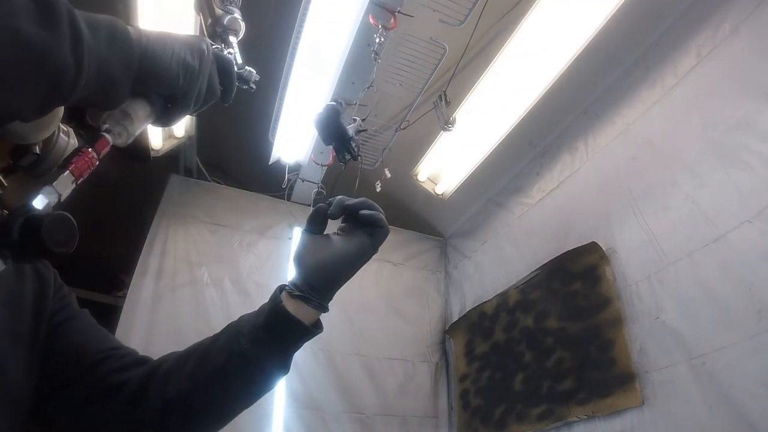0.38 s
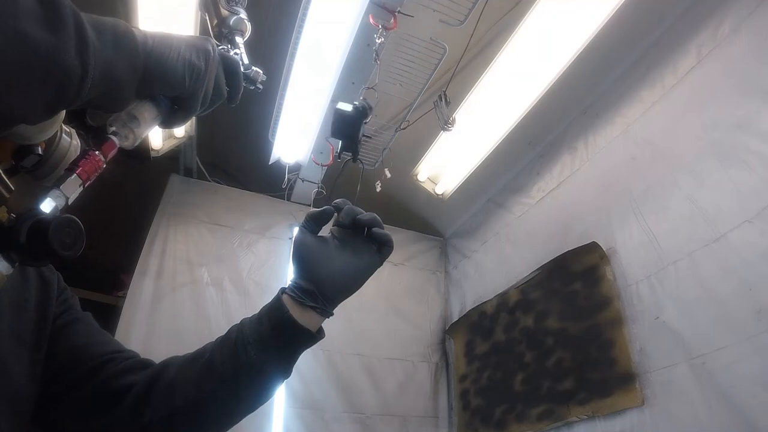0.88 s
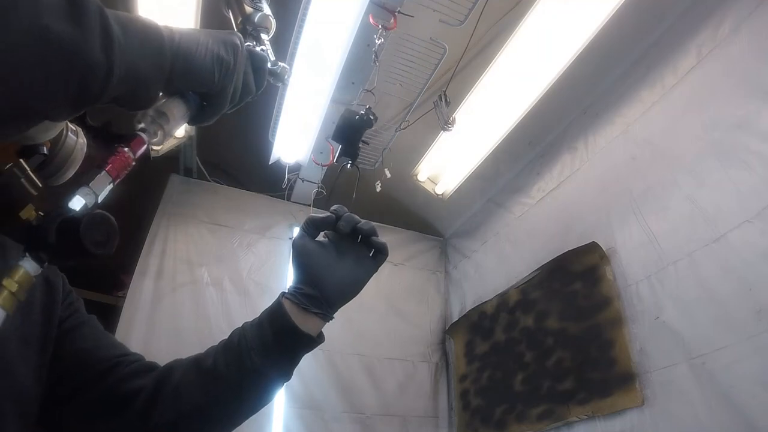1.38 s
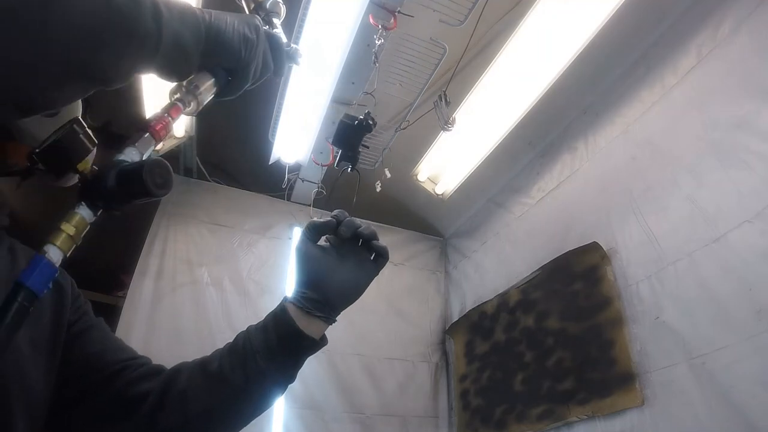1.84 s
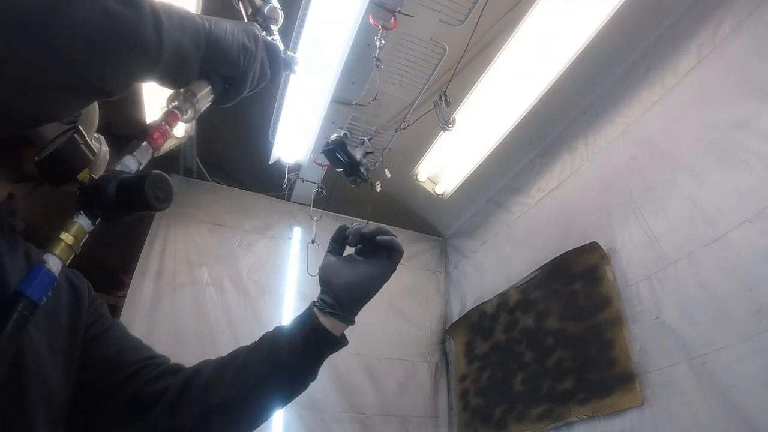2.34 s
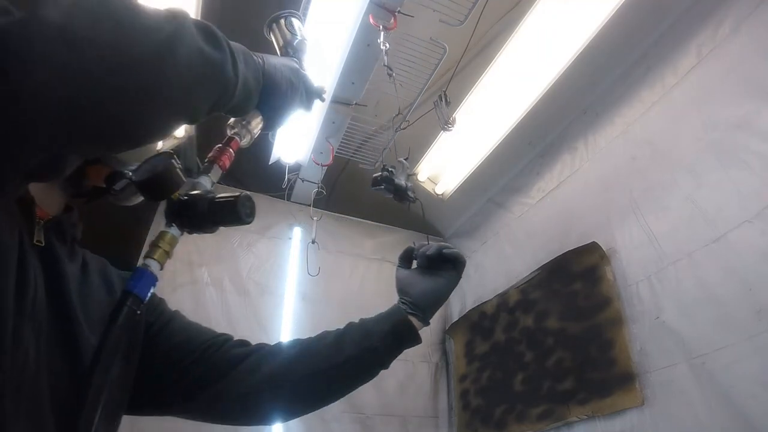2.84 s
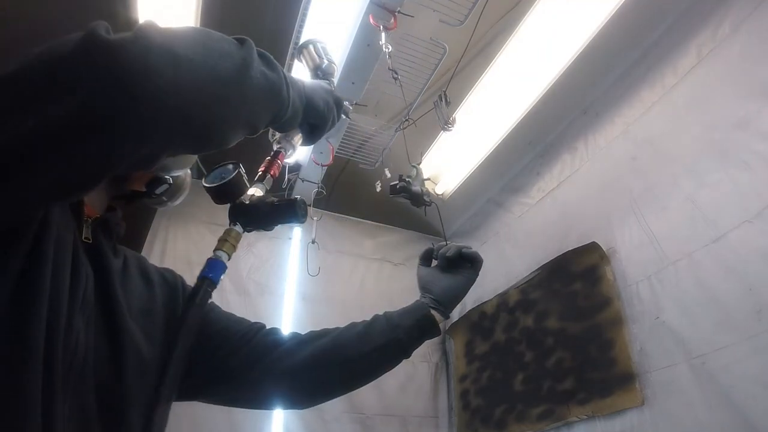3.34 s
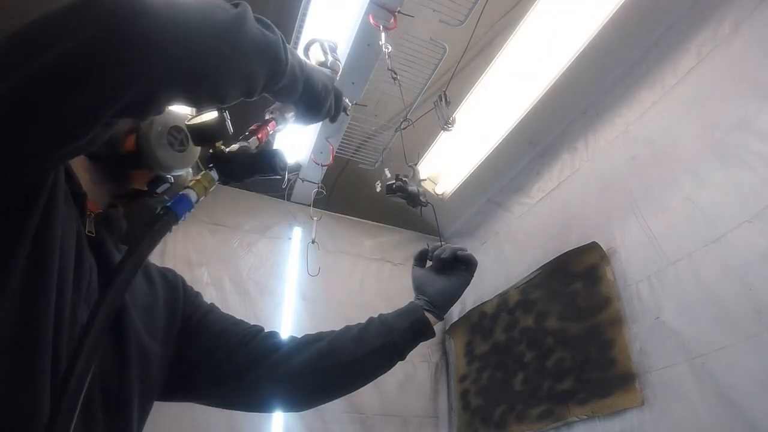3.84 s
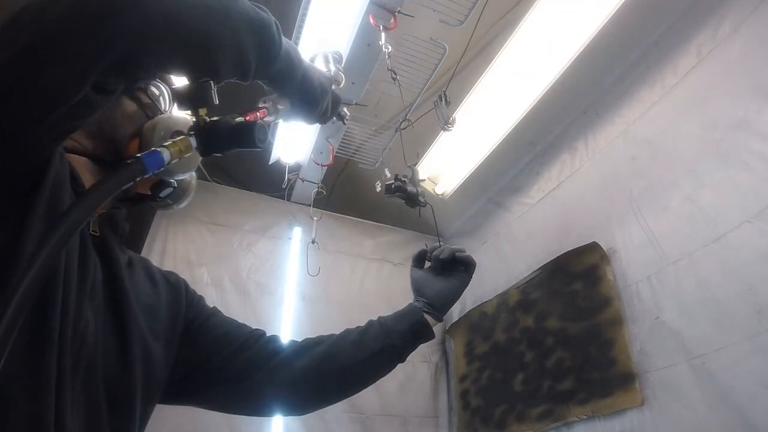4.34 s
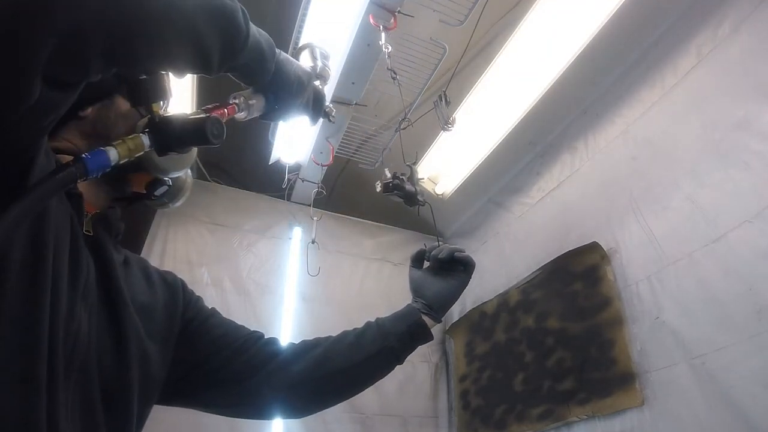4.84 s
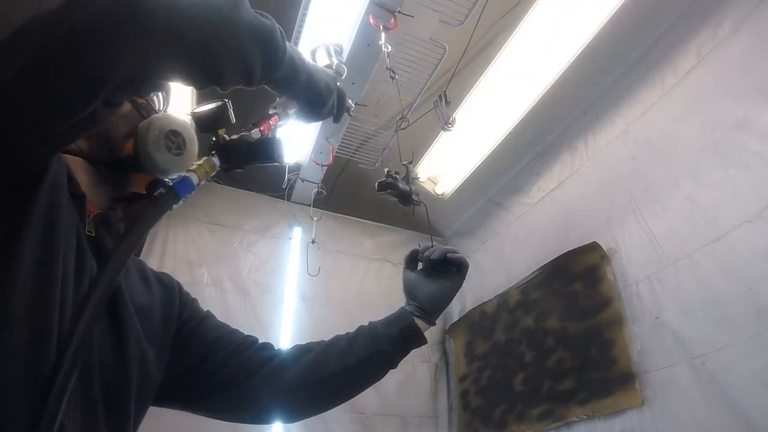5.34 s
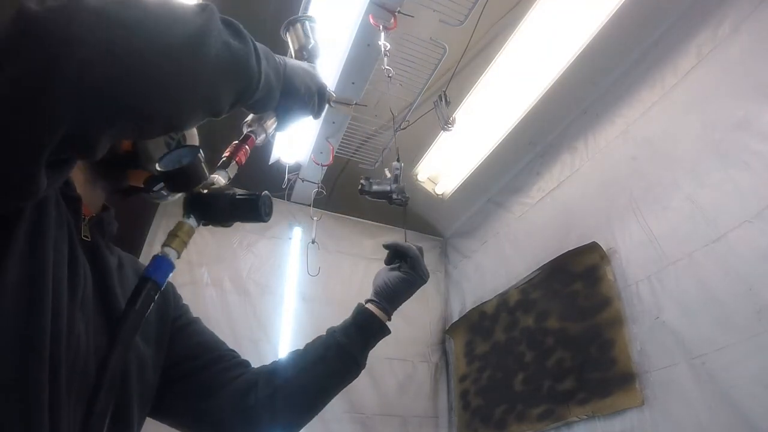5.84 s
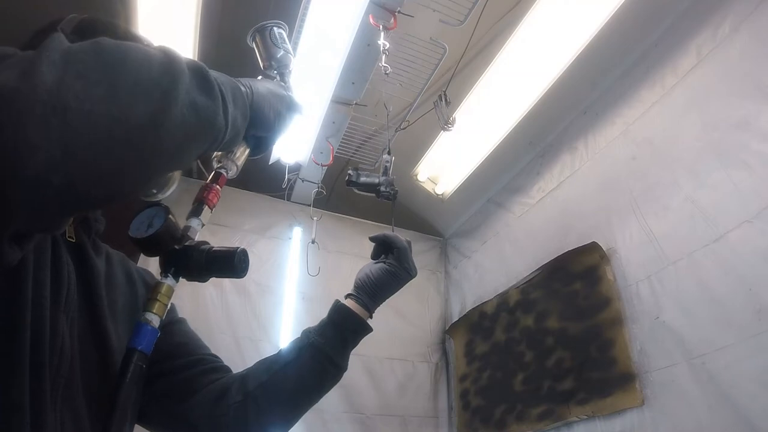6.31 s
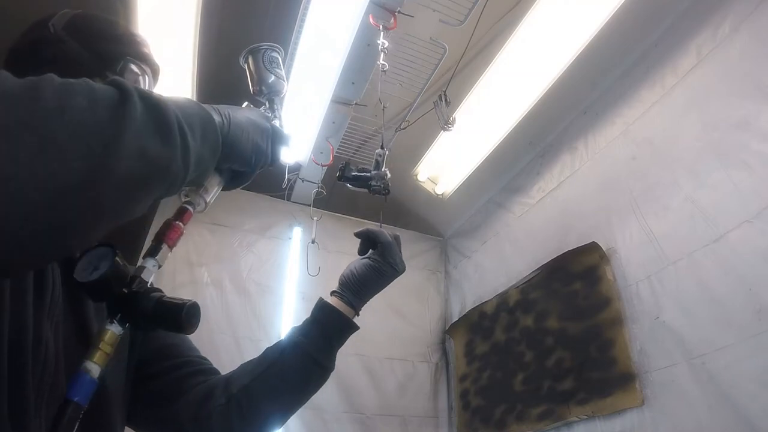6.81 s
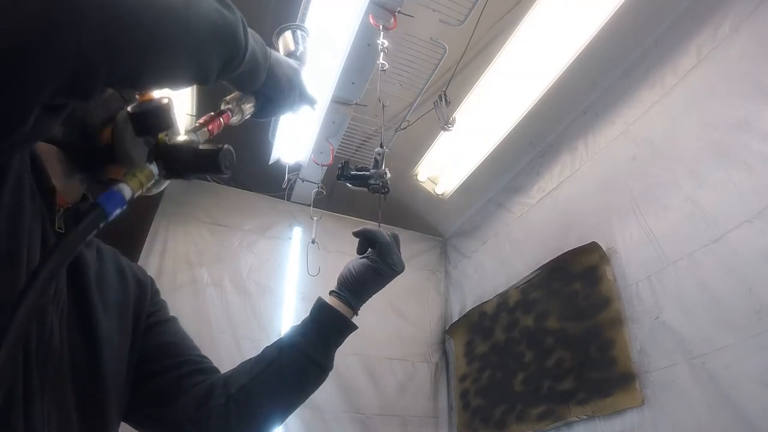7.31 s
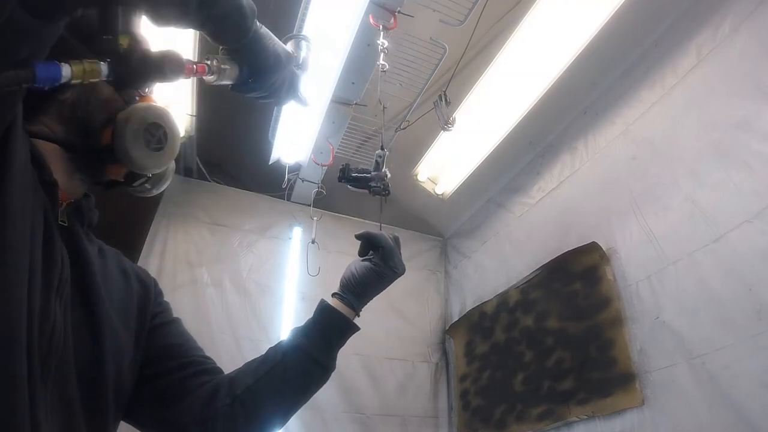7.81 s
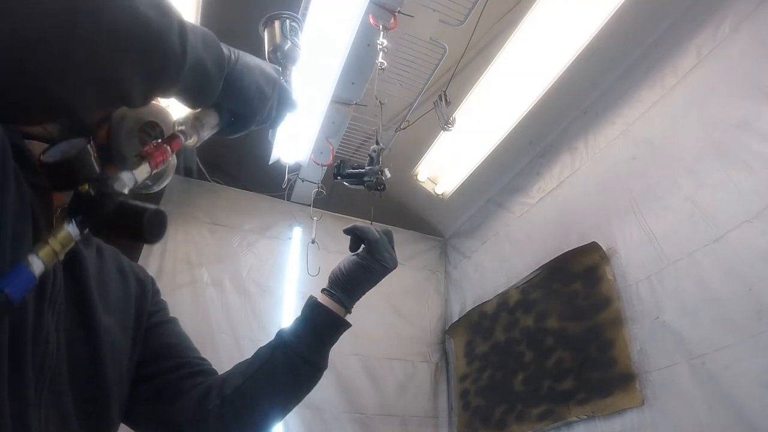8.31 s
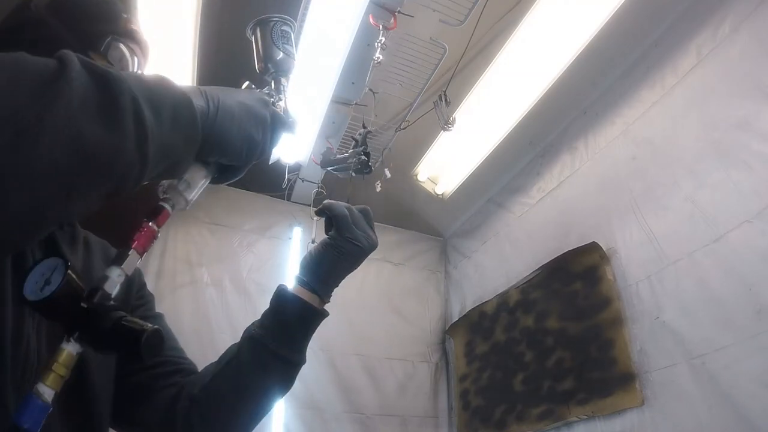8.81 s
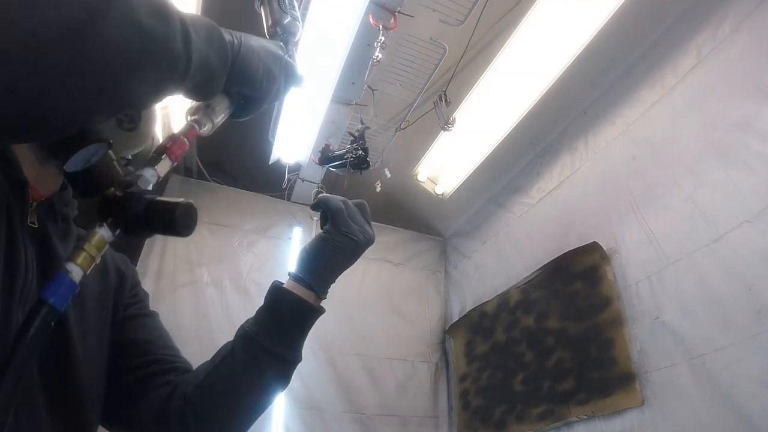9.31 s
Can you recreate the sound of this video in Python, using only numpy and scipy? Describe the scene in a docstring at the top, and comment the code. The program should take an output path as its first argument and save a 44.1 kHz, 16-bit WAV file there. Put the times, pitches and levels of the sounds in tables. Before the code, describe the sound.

A spray gun fires eight short bursts of airy hiss, fuller at first, later brighter, over a fan's rush; a hanging part knocks once.

```python
"""Spray gun in a booth

A compressed-air spray gun is fired in short trigger pulls inside a spray booth, close to the microphone.
The jet is shaped noise that hisses, duller or brighter as the gun turns; sparse echoes ring after each pull.
The booth's fan drones behind it: a steady rush of noise with faint sine tones from the blades.
Once the hanging part gives a knock and rattles: a burst of dying sine tones and noise."""
import sys
import numpy as np
from scipy import signal
from scipy.io import wavfile
from scipy.ndimage import uniform_filter1d

SR = 44100
rng = np.random.default_rng(int(sys.argv[2]) if len(sys.argv) > 2 else 0)


def master(y):
    """Save y as 16-bit WAV."""
    cut = np.clip(np.atleast_2d(y).T, -1, 1)
    pcm = np.round(cut * 32767)  # scale
    wavfile.write(sys.argv[1], SR, pcm.astype(np.int16))


def amplitude_ratio(level_db):
    """Convert a level in decibels to the matching linear amplitude (field) ratio."""
    exponent = np.asarray(level_db, float) / 20
    return 10 ** exponent


N = 426447  # length of the sound (samples)
LEAD = SR // 4  # samples played before time zero, so that an earlier pull rings on


def evened(x):
    """Scales a sound to an rms level of 1."""
    return x / np.sqrt(np.mean(x ** 2) + 1e-20)


def read(points, hz):
    """Reads a table of (pitch, value) between its points, along log frequency."""
    f, value = np.transpose(points)
    return np.interp(np.log(hz + 1), np.log(f + 1), value)


def noise(length, size, colour_db, patchy_db, flicker_db):
    """Noise from random short-time spectra under colour_db(Hz, s), with drifting patches and a shared flicker."""
    hop = size // 4
    frames = length // hop + 5
    hz = np.fft.rfftfreq(size, 1 / SR)
    t = np.arange(frames) * hop / SR
    real, imaginary, patches = rng.standard_normal((frames, len(hz), 3)).T
    patches = uniform_filter1d(patches, size=size // 64, axis=0)  # smooth across pitch
    patches = evened(uniform_filter1d(patches, size=16, axis=1))  # and across time
    flicker = evened(uniform_filter1d(rng.standard_normal(frames), size=4))
    field_db = colour_db(hz[:, None], t) + patchy_db * patches + flicker_db * flicker
    spectra = (real + 1j * imaginary) * amplitude_ratio(field_db)
    return signal.istft(spectra, nperseg=size, noverlap=size - hop)[1][:length]


# colour of the recorder's rumble, relative: (pitch_hz, level_db per Hz)
RUMBLE_COLOUR = [(15, -3), (30, -7), (55, -3.5), (80, -9), (115, -14), (160, -23.5)]
RUMBLE_DB = -72  # rms level


def recorder_rumble():
    """Faint low noise of the recorder's own, steady in colour."""
    low = noise(N, size=8192, colour_db=lambda hz, at: read(RUMBLE_COLOUR, hz) + 0 * at,
                patchy_db=0, flicker_db=0)
    return amplitude_ratio(RUMBLE_DB) * evened(low)


# colour of the booth's airflow, relative: (pitch_hz, level_db per Hz)
AIRFLOW_COLOUR = [(150, -3), (200, -3.5), (300, -9), (450, -12.5), (700, -16), (1100, -19), (2000, -23),
                  (3400, -30.5), (4650, -40.5), (5600, -34), (7200, -26.5), (9500, -29), (11500, -34),
                  (15200, -39)]
AIRFLOW_DB = -53.3  # rms level, ahead of the low cut
# tones of the fan blades, ahead of their fading: (multiple of the blade rate, level_db rms)
BLADE_TONES = [(6, -82), (7, -80), (8, -80), (10, -77), (12, -86)]
# fading of the blade tones: (time_s, gain_db)
BLADE_FADE = [(0, -1), (1.2, -1), (2, -6), (5.8, -7), (8.3, -10), (9.7, -10)]
BLADE_HZ = 115.2  # blade passing rate


def extractor():
    """Steady rush of the booth's airflow with faint, slightly wavering blade tones."""
    rush = noise(N, size=2048, colour_db=lambda hz, at: read(AIRFLOW_COLOUR, hz) + 0 * at,
                 patchy_db=1.1, flicker_db=.6)
    t = np.arange(N) / SR
    waver = 1 + 0.0011 * np.sin(2 * np.pi * 0.321 * t)
    passes = BLADE_HZ * np.cumsum(waver) / SR  # blades gone by so far
    tones = np.zeros(N)
    for multiple, level_db in BLADE_TONES:
        wave = np.sin(2 * np.pi * (multiple * passes + rng.random()))
        tones += np.sqrt(2) * amplitude_ratio(level_db) * wave  # sqrt(2) turns rms into peak
    fade = amplitude_ratio(np.interp(t, *np.transpose(BLADE_FADE)))
    return amplitude_ratio(AIRFLOW_DB) * evened(rush) + fade * tones


# echoes of the booth, how long each pitch takes to fall by 60 dB: (pitch_hz, t60_s)
BOOTH_DECAY = [(300, 1), (1300, 0.53), (3500, 0.39), (7000, 0.41), (13000, 0.22)]
BOOTH_DB = -8.5  # level of each set of echoes


def booth(x):
    """Sparse echoes that die band by band; the tail changes as the gun moves."""
    at = np.arange(120, SR // 2 - 20, 20)
    taps = np.zeros((3, SR // 2))
    places = at + rng.integers(0, 20, (3, len(at)))  # one echo somewhere in every 20 samples
    np.put_along_axis(taps, places, rng.choice([-1., 1.], (3, len(at))), 1)
    hz, t, spectra = signal.stft(taps, SR, nperseg=256)
    fading = amplitude_ratio(-60 * t / read(BOOTH_DECAY, hz)[:, None])
    tails = signal.istft(spectra * fading, SR, nperseg=256)[1]
    tails = amplitude_ratio(BOOTH_DB) * tails / np.linalg.norm(tails, axis=1)[:, None]
    # three source places take turns
    turns = np.arange(len(x)) / SR * 4 + np.arange(3)[:, None] / 3
    shares = np.sqrt(2 / 3) * np.cos(np.pi * turns)
    late = signal.oaconvolve(x * shares, tails, axes=1).sum(0)
    return (x + late[:len(x)])[LEAD:]


# the blow on the hanging part and its bounces: (time_s, level_db, the peak of the ringing)
BLOWS = [(2.4752, -28), (2.4798, -37), (2.504, -43), (2.52, -46), (2.539, -48)]
# ringing tones of the hanging part, relative: (pitch_hz, level_db, t60_s)
PART_TONES = [(480, -14, .025), (720, -9, .015), (980, -8, .016), (1260, 0, .011), (1280, -25, .08),
              (1480, -2, .010), (1830, -6, .013), (2200, -12, .012), (2550, -12, .018), (2950, -12, .013),
              (3300, -14, .014), (4200, -20, .009), (5400, -22, .008)]


def knock():
    """A dry clack: damped tones of the part, a crack on top and a short rattle behind."""
    out, t = np.zeros(N + LEAD), np.arange(SR // 6) / SR
    ring = np.zeros(len(t))
    for hz, level_db, t60 in PART_TONES:
        ring += amplitude_ratio(level_db - 60 * t / t60) * np.sin(2 * np.pi * hz * t)
    ring = ring * (1 - np.exp(-t / .0006)) ** 2  # soft start
    grit = rng.standard_normal(len(t))
    crack = amplitude_ratio(-15 - 60 * abs(t - .0035) / .008) * uniform_filter1d(grit, size=3)
    rattle_band = signal.butter(2, [500, 2200], "band", fs=SR, output="sos")
    rattle = evened(signal.sosfilt(rattle_band, grit[::-1]))
    rattle = amplitude_ratio(-16 - 60 * t / .16) * rattle * (1 - np.exp(-t / .003))
    clack = ring / abs(ring).max() + crack + rattle
    for time_s, level_db in BLOWS:
        out[LEAD + round(time_s * SR):][:len(t)] += amplitude_ratio(level_db) * clack
    return out


# trigger pulls: (opens_s, shuts_s, level_db of the jet in 5-11 kHz ahead of the booth,
# surge_db on opening, travel_s of the opening valve)
PULLS = [(-.2, -0.058, -44.5, 11, .013), (1.239, 1.742, -41, 1.5, 0.017), (3.194, 3.616, -40, 0.5, 0.0091),
         (3.912, 4.802, -40, 1.5, 0.013), (4.9, 5.315, -41, 2, 0.017), (6.305, 6.681, -36, 0.5, 0.0065),
         (6.868, 7.168, -35, 0.5, 0.016), (7.527, 7.849, -35.5, 4, 0.031), (8.679, 9.649, -34, 0.5, 0.0056)]
# aim of the gun, heard as a balance that falls as the gun turns:
# (time_s, balance_db of 1-3.5 kHz against 5-11 kHz, before the thinning)
AIM = [(0, -4), (1.5, -3.5), (3.4, -5), (4.1, -4.5), (4.47, -6), (4.7, -9), (4.95, -4), (5.1, -4),
       (5.4, -4), (6.3, -18), (7.0, -18), (7.6, -20.5), (8.7, -17.5), (9.15, -20), (9.6, -20)]
# at both ends of the trigger's travel air flows without coating: louder and thinner
WET_S, DRY_S = 0.22, 0.055  # time for the coating to come in after opening, and to run dry before shutting
DRY_DB, THIN_DB = 2, -4.5  # gain of the bare air before shutting, change of its balance


def trigger(t):
    """Jet level and balance in dB over time: one level a pull, the aim, and the bare-air ends."""
    rows = np.array(PULLS)
    pull = np.clip(np.searchsorted(rows[:, 0], t) - 1, 0, None)  # the latest pull begun
    opens, shuts, level_db, surge_db, _ = rows[pull].T
    first = np.exp(-np.maximum(t - opens, 0) / WET_S)
    last = np.exp(-np.maximum(shuts - t, 0) / DRY_S)
    jet_db = level_db + surge_db * first + DRY_DB * last
    balance_db = np.interp(t, *np.transpose(AIM)) + THIN_DB * (first + last)
    return jet_db, balance_db


# colour of the jet in the gun's duller position, relative: (pitch_hz, level_db per Hz)
ROAR = [(300, -8), (560, -13.5), (800, -6), (1300, -4), (2400, -4), (3000, 1), (3600, 2.5), (4000, -4),
        (4500, -4.5), (5200, 0.5), (6600, 0), (7800, -1.5), (11000, -16), (15200, -21)]
# colour of the jet in the gun's brighter position, relative: (pitch_hz, level_db per Hz)
HISS = [(300, -22), (600, -20), (1050, -17.5), (1850, -14), (3310, -14.5), (4440, -19), (5630, -3.5),
        (7050, -0.5), (8820, -5.5), (10200, -4), (12000, -20.5), (13500, -18.5), (15200, -26)]
# hollows of the part rung by the roar: (pitch_hz before the drift, width_hz, change_db)
HOLLOWS = [(1905, 250, 5), (2440, 97, 5), (2940, 190, 3), (3420, 150, 3), (3830, 100, 0.5),
           (5300, 150, -0.5), (5870, 90, -8)]
# drift of the hollows as the jet sweeps the part: (time_s, pitch factor)
HOLLOW_DRIFT = [(1.2, 1.02), (1.8, 1), (3.4, 1.25), (4.0, 0.76), (4.7, 1.07), (5.1, 0.88)]
ROAR_AT_DB, HISS_AT_DB = -3, -19.5  # balance at which each colour is heard alone
JET_BAND_HZ = [5000, 11000]  # band in which the jet's level is set
JET_SIZE = 512  # samples in one short spectrum of the jet
BLEED_S = 0.015  # time constant of the air left in the gun


def jet_colour_db(hz, at):
    """Blend of the two colours as the gun turns, held at equal power in the jet's band."""
    ahead = at - (LEAD - JET_SIZE / 2) / SR  # read half a spectrum early
    share = (trigger(ahead)[1] - ROAR_AT_DB) / (HISS_AT_DB - ROAR_AT_DB)
    drift = np.interp(at - LEAD / SR, *np.transpose(HOLLOW_DRIFT))
    rung = read(ROAR, hz)
    for hollow_hz, width_hz, change_db in HOLLOWS:
        rung = rung + change_db / (1 + (2 * (hz - hollow_hz * drift) / width_hz) ** 2)
    blend = (1 - share) * rung + share * read(HISS, hz)
    band = (hz[:, 0] > JET_BAND_HZ[0]) & (hz[:, 0] < JET_BAND_HZ[1])
    return blend - 10 * np.log10(np.mean(amplitude_ratio(2 * blend[band]), axis=0))


def jet():
    """Turbulent air from the nozzle, heard as noise; the valve opens over its travel, then the air bleeds out."""
    t = (np.arange(N + LEAD) - LEAD) / SR
    air = noise(N + LEAD, size=JET_SIZE, colour_db=jet_colour_db, patchy_db=.8, flicker_db=.7)
    band = signal.sosfilt(signal.butter(6, JET_BAND_HZ, "band", fs=SR, output="sos"), air)
    flow = np.zeros(len(t))
    for opens, shuts, _, _, travel in PULLS:
        rise = np.sin(np.pi / 2 * np.clip((t - opens) / travel, 0, 1)) ** 2
        flow += rise * np.exp(-np.maximum(t - shuts, 0) / BLEED_S)  # trapped air bleeds out
    return air / np.std(band) * flow * amplitude_ratio(trigger(t)[0])


def scene():
    """One microphone hears the jet and the knock in the booth, with the fan, and feeds both channels."""
    mono = booth(jet() + knock()) + extractor()
    return np.array([mono, mono])


# moments when everything outside one band drops out:
# (centre_s, length_s of the gap, depth_db, kept_from_hz, kept_to_hz)
DROPS = [(.082, .001, -13, 100, 1100), (.125, .003, -14, 100, 1700), (3.69, .003, -5.5, 100, 900),
         (4.949, 0.0036, -9, 5500, 9150), (5.458, .001, -10, 100, 900), (5.777, .001, -8, 100, 1000),
         (5.95, .003, -6, 100, 1500), (6.013, .001, -16, 100, 2000), (1.599, .004, -5, 4800, 8700),
         (4.73, 0.0055, -10, 4970, 9200), (6.803, .004, -5, 100, 1000), (7.19, .004, -10.5, 5000, 11300),
         (7.315, .004, -6, 100, 1500), (7.76, 0.04, -63, 5500, 11400), (9.148, .003, -13, 5300, 11200),
         (9.233, 0.0024, -14, 5600, 11000), (9.308, 0.025, -65, 5260, 11500), (1.94, 0.0036, -4, 100, 1200),
         (2.065, .004, -9, 100, 1700), (2.24, .004, -5, 100, 1700), (2.345, .004, -7, 100, 1700),
         (2.514, .001, -18, 100, 3000), (2.62, .004, -8, 100, 2400), (2.685, .004, -9, 100, 1700),
         (2.983, .004, -15, 100, 2800)]
DROP_FADE_S = 0.013  # fade on either side of a gap


def dropouts(x):
    """The sound thins to one band for a few hundredths of a second: the rest is faded down and back."""
    out, near = x.copy(), np.arange(-SR // 10, SR // 10)
    for centre_s, length_s, depth_db, from_hz, to_hz in DROPS:
        at = round(centre_s * SR) + near
        band = signal.butter(8, [from_hz, to_hz], "band", fs=SR, output="sos")
        kept = signal.sosfiltfilt(band, out[:, at])
        outside_s = abs(near) / SR - length_s / 2
        back = np.sin(np.pi / 2 * np.clip(outside_s / DROP_FADE_S, 0, 1)) ** 2
        gain = amplitude_ratio(depth_db) + (1 - amplitude_ratio(depth_db)) * back
        out[:, at] = kept + (out[:, at] - kept) * gain
    return out


def low_pass(x):
    """Removes everything above the highest recorded frequency."""
    return signal.sosfilt(signal.butter(12, 15550, fs=SR, output="sos"), x)


def record(dry):
    """Steep low cut, the recorder's rumble added after it, brief dropouts, then a limit on the treble."""
    low_cut = signal.cheby2(12, 40, 121, "high", fs=SR, output="sos")
    cut = signal.sosfilt(low_cut, dry)
    thinned = dropouts(cut + recorder_rumble())
    treble_limit = signal.firwin(1023, 15270, window=("kaiser", 10), fs=SR)
    mix = signal.oaconvolve(thinned, treble_limit[None], "same")
    return low_pass(mix)


dry = scene()
out = record(dry)
master(out)
```